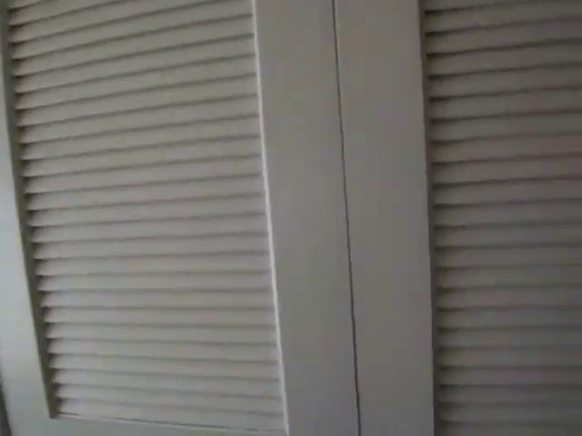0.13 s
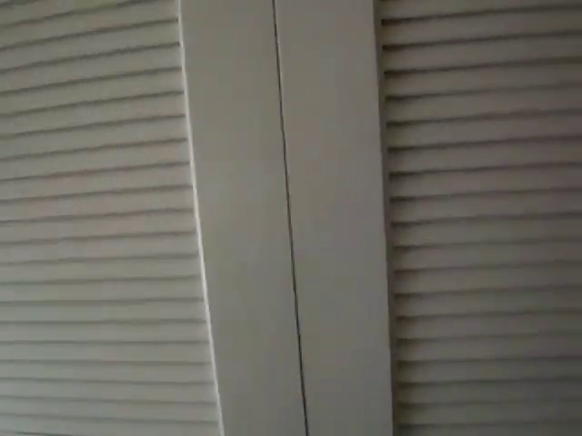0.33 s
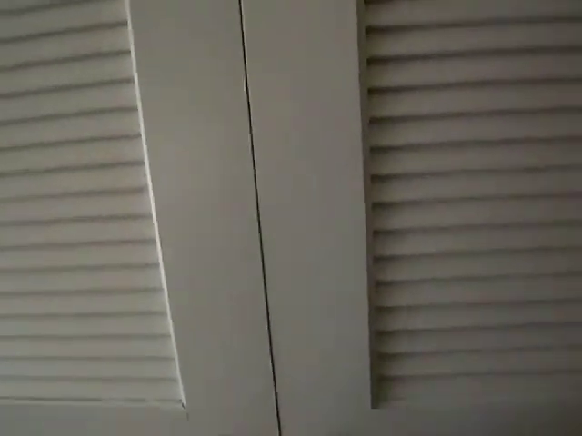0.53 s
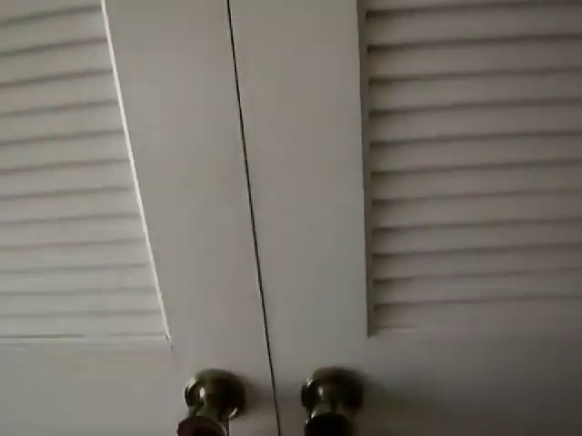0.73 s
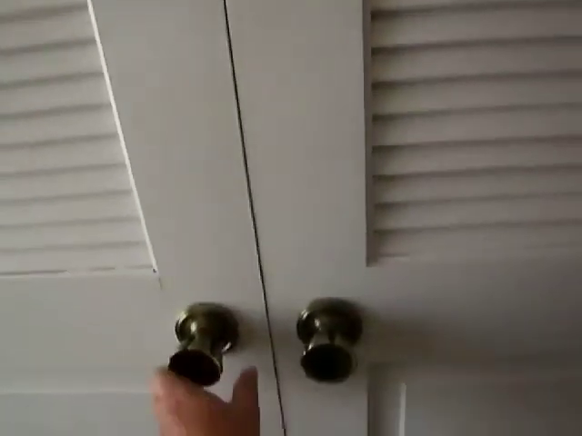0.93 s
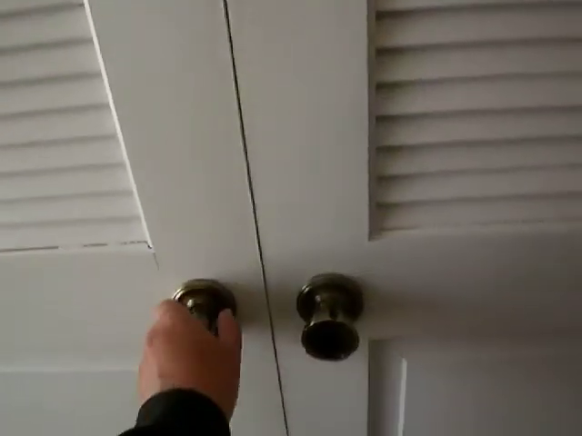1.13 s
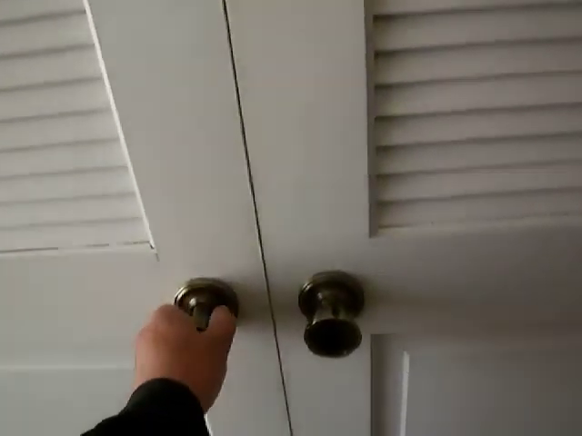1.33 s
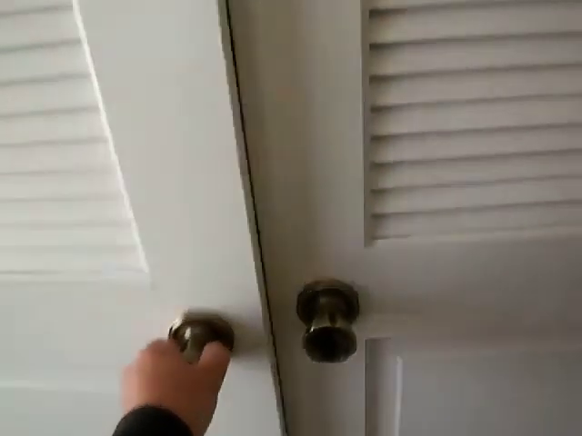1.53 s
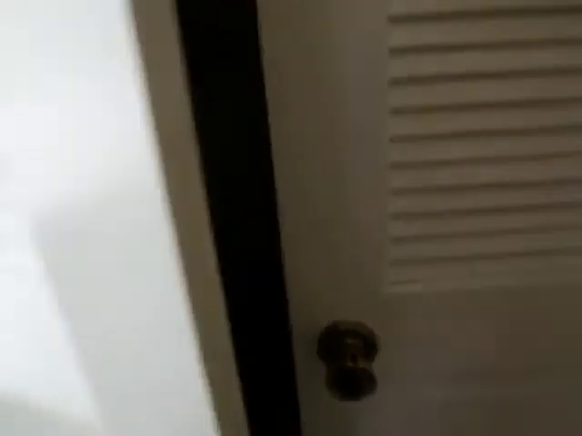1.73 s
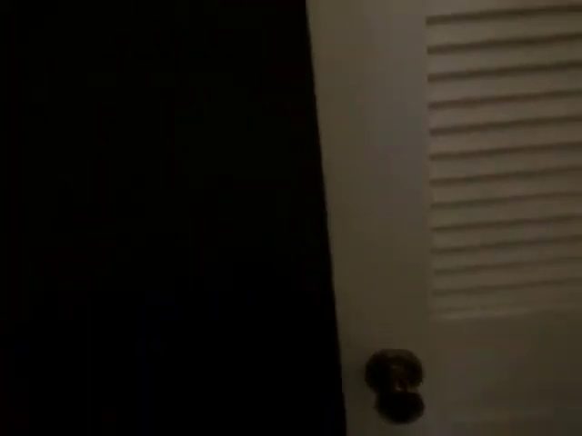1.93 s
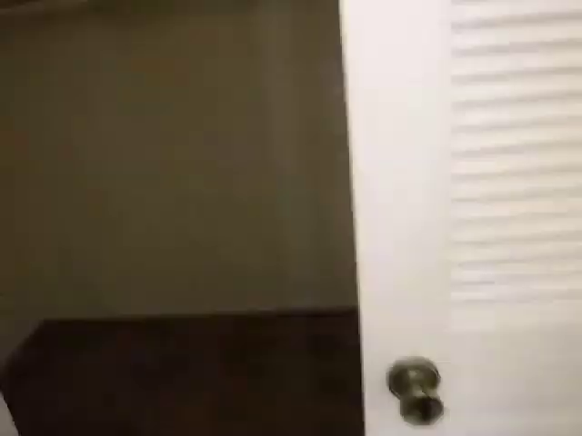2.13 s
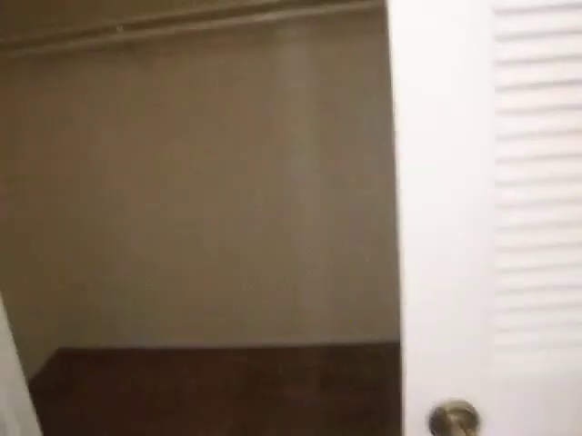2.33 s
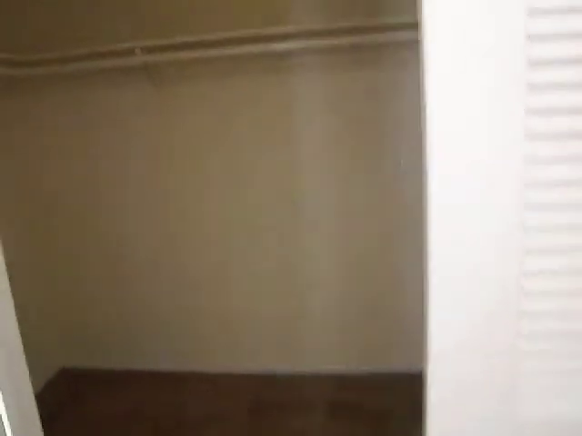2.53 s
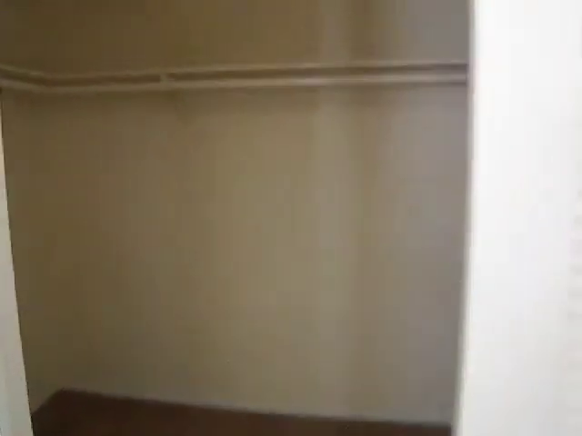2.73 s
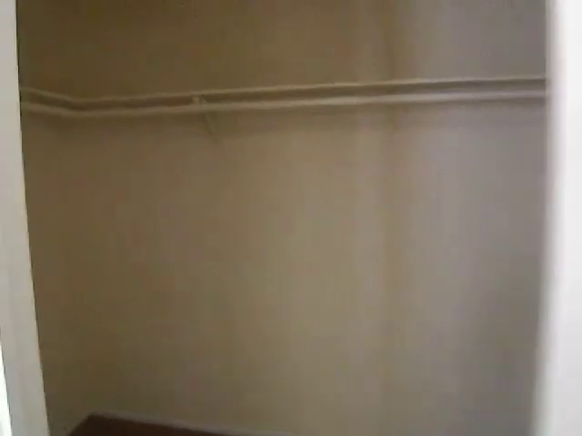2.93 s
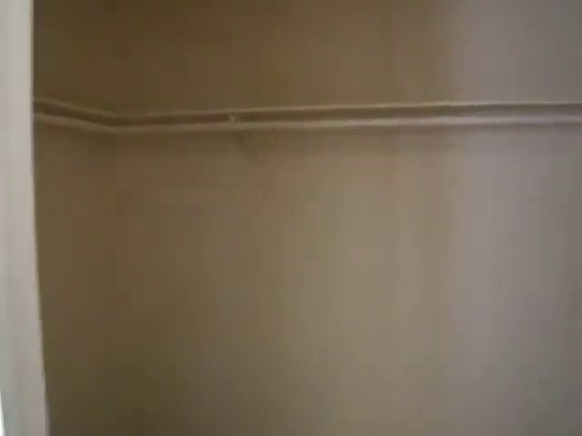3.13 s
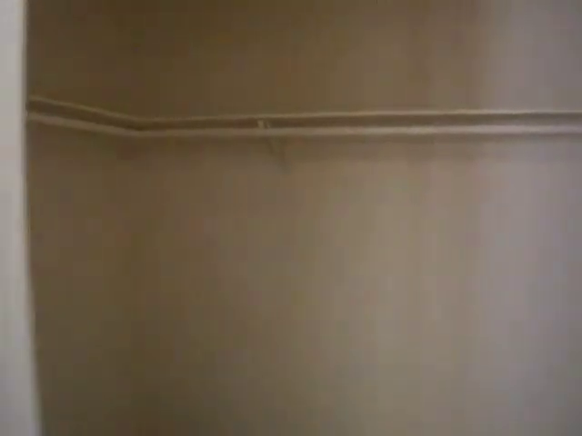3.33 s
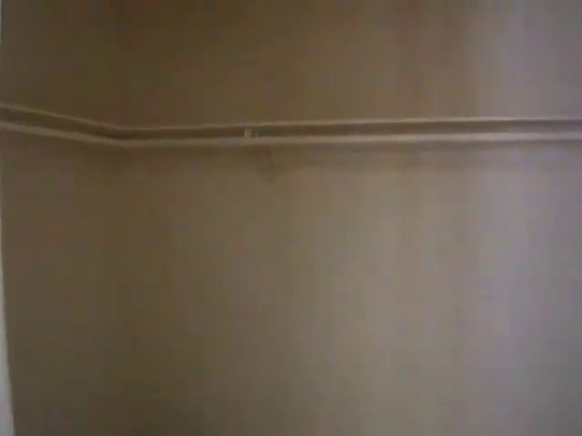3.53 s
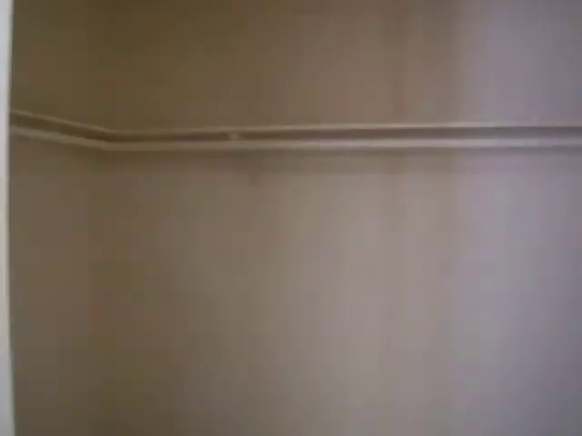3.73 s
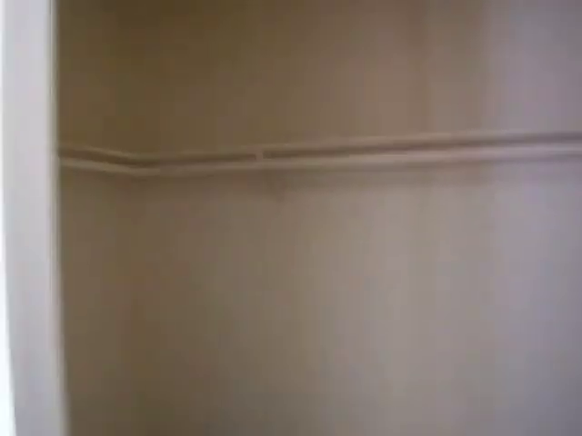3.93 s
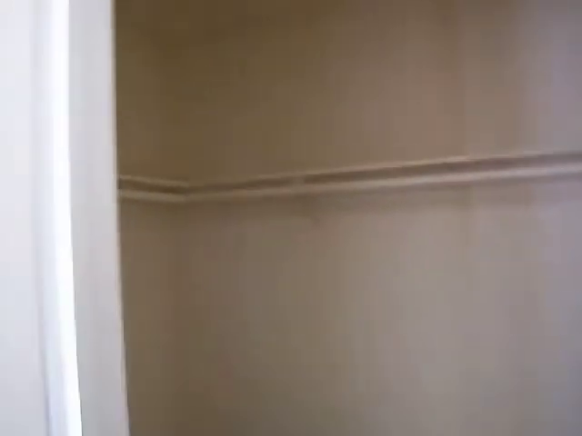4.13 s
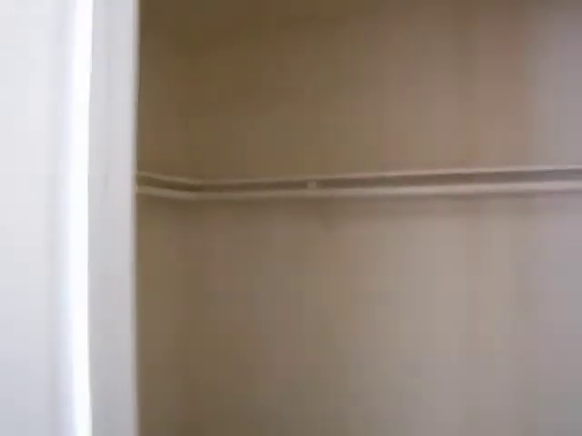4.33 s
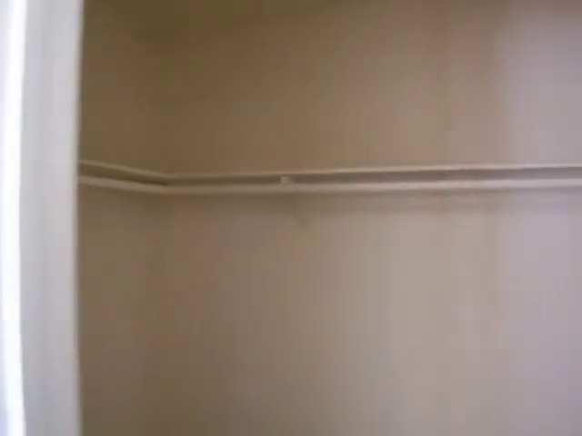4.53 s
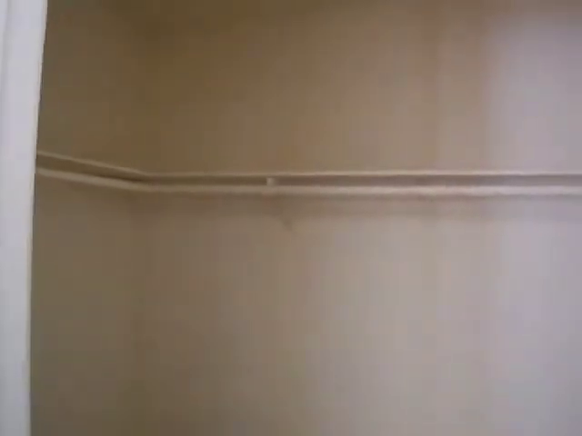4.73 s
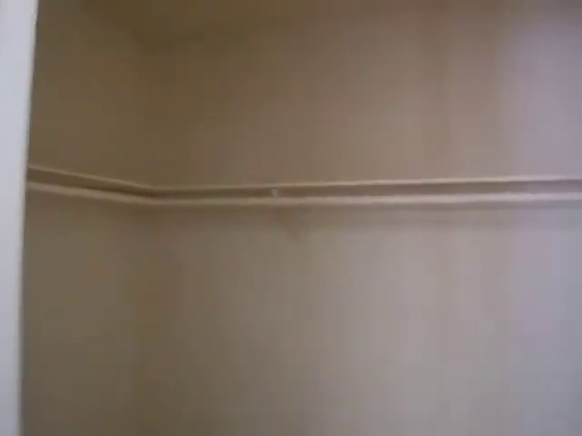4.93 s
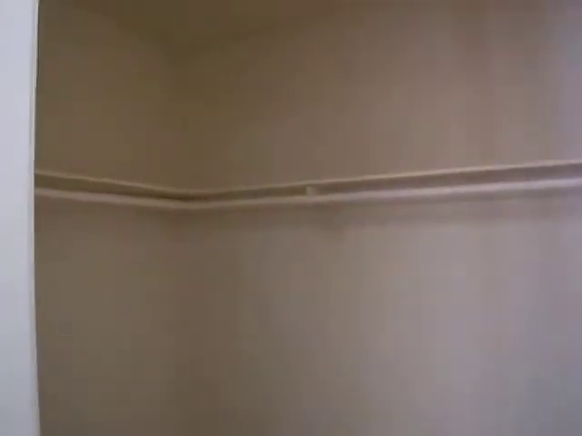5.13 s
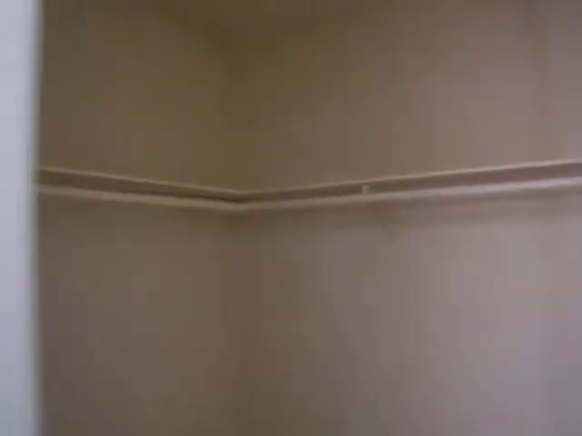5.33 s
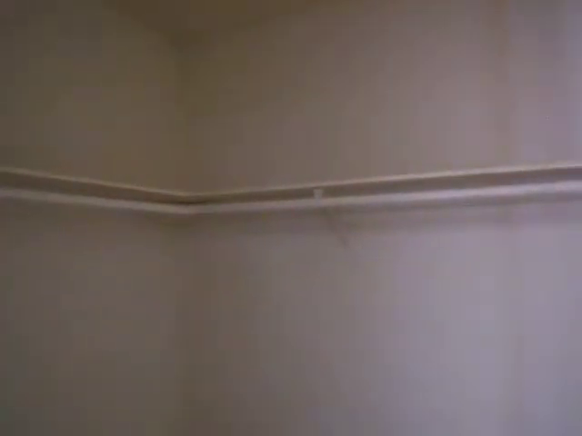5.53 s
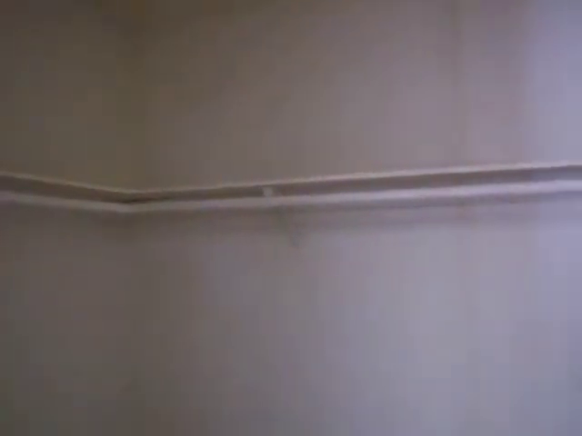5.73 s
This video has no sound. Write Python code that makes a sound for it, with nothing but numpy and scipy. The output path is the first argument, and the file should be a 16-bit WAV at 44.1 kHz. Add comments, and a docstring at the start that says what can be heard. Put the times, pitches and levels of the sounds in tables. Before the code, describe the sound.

Close to a hand-held microphone in an empty room, soft rubs and a knob touch lead to small wooden knocks, then a sharp crack as the first slatted closet door pops free and rattles faintly. After a lull with air puffs, the second door bangs loose and shudders more strongly, then settles into low hum and hiss.

```python
"""A low throbbing hum and hiss in an empty room, then two louvered wooden closet doors are pulled free in turn.
Close to a hand-held camera, each leaf strains as uneven slips ringing a resonance, and bangs as rough contacts
drive its wooden modes. It then shivers against its track about 13 times a second while friction noise slides.
Thin metal modes chink at knob and pivot; low noise and single puffs of pressure buffet the microphone."""
import sys
import numpy as np
from scipy import signal
from scipy.fft import rfft, irfft
from scipy.io import wavfile
from scipy.ndimage import uniform_filter1d

SR = 44100
rng = np.random.default_rng(int(sys.argv[2]) if len(sys.argv) > 2 else 0)


def inscribe(sig):
    """Save sig as 16-bit PCM at rate SR to the path in sys.argv[1].

    A 1-D sig is mono; a 2-D sig holds one channel per row.
    Samples are clipped to [-1, 1] before scaling.
    """
    pcm = np.round(np.clip(np.atleast_2d(sig).T, -1, 1) * 32767)
    wavfile.write(sys.argv[1], SR, pcm.astype(np.int16))


N = 259308

# air on the microphone and dull rumble: start_s, buffet_db, rumble_db
AIR_LEVELS = [(0.0, -48.5, -49), (0.77, -44.5, -52.5), (0.85, -50, -45.5), (1.15, -47, -54),
              (1.28, -37, -35.5), (1.42, -37.5, -46), (1.6, -28, -24.5), (1.64, -25, -44),
              (1.74, -31.5, -37.5), (2.03, -40.5, -67), (2.15, -29.5, -59), (2.23, -40, -72),
              (2.31, -44, -51), (2.59, -39, -57), (2.75, -31, -54), (2.96, -54.5, -64), (3.47, -48.5, -58),
              (3.85, -32, -39.5), (4.01, -39, -52), (4.31, -43.5, -48.5), (4.88, -51, -59),
              (5.88, -50, -61.5)]
# sliding in the track and rustle of the moving person: start_s, slide_db, rustle_db
MOTION_LEVELS = [(0.0, -56, -58), (.3, -55.5, -57.5), (.7, -62, -62), (1.21, -60, -59), (1.28, -65, -47),
                 (1.39, -44.5, -59), (1.49, -46, -47), (1.65, -40, -41.5), (1.96, -53.5, -63),
                 (2.29, -48.5, -63.5), (2.6, -52, -57.5), (3.06, -55, -64.5), (3.29, -64.5, -70),
                 (3.56, -72, -78.5), (3.68, -46.5, -41.5), (3.78, -55, -54), (3.83, -33, -37.5),
                 (4.16, -51, -53.5), (4.55, -52.5, -52), (4.9, -59, -66), (5.24, -61.5, -64.5),
                 (5.88, -69, -73)]
# each leaf tapping its track: beat_s, contact_length_s, ring_db,
# then mean colour: drum_db, boom_db, hollow_db, body_db, clack_db, tick_db
LEAF_SHIVERS = [(0.0771, 0.0088, -8.5, -18.5, -26, -17.5, -6.5, -16, -30.5),
                (.0784, 0.0076, -5, -24, -32.5, -25.5, -13, -13, -15.5)]
# strength of those taps, one list a leaf: start_s, level_db (before colour)
SHIVER_LEVELS = [
    [(1.731, -26), (1.88, -43), (1.96, -41), (2.037, -36.5), (2.12, -39), (2.2, -40)],
    [(3.8605, -18), (4.02, -26), (4.17, -19), (4.41, -19), (4.645, -21), (4.72, -37.5), (4.89, -44.5)],
]


def gain_of(db):
    """dB to gain."""
    return 10 ** (np.asarray(db) / 20)


def evened(x):
    """Scales to rms 1."""
    return x / np.sqrt(np.mean(x ** 2) + 1e-20)


def steadied(x, samples):
    """Evens out the swell of a narrow noise, keeping its wandering phase."""
    power = abs(uniform_filter1d(x ** 2, int(samples)))
    return evened(x / np.sqrt(power + 0.12 * np.mean(x ** 2)))


def read(points, hz):
    """Reads a spectrum on a log frequency axis."""
    f, value = np.transpose(points)
    return np.interp(np.log(hz + 1), np.log(f + 1), value)


def curves(rows):
    """Columns of a table at every sample."""
    s, *columns = np.transpose(rows)
    return [np.interp(np.arange(N) / SR, s, c) for c in columns]


def resonate(x, hz, width):
    """A resonance of gain 1: shifts the curve hz down to zero, smooths, and shifts back."""
    turn = np.exp(2j * np.pi * np.cumsum(hz * np.ones(len(x))) / SR)
    r = np.exp(-np.pi * width / SR)
    smooth = signal.lfilter([1 - r], [1, -r], x / turn + 1e-18)
    return 2 * (turn * smooth).real


def band(x, lo_hz, hi_hz):
    """Band-pass."""
    return signal.sosfilt(signal.butter(4, [lo_hz, hi_hz], "band", fs=SR, output="sos"), x)


def coloured(points):
    """Steady noise of a given spectrum, at rms 1."""
    z = rfft(rng.standard_normal(N))
    return evened(irfft(z * gain_of(read(points, np.fft.rfftfreq(N, 1 / SR))), N))


def lumps(per_s, depth_db):
    """Random unevenness of level."""
    return evened(gain_of(depth_db * evened(band(rng.standard_normal(N), per_s / 8, per_s))))


def floor():
    """Steady hiss, with a buzz of short even dips in the camera's electronics."""
    # spectrum of the hiss: frequency_hz, relative_db_per_hz
    hiss_spectrum = [(12, -27.5), (20, -1.5), (42, 4), (112, -3), (273, -21.5), (420, -14), (1780, -27),
                     (2030, -27.5), (7390, -28.5), (7970, -37.5), (8600, -72), (11200, -97), (18900, -120)]
    hiss_db = -56.5
    buzz_hz, first_dip_s, dip_db, dip_width_s = 30.02, .0303, -43, 0.0022
    cycle = ((np.arange(N) / SR - first_dip_s) * buzz_hz + .5) % 1 - .5
    dips = np.exp(-(cycle / buzz_hz / dip_width_s) ** 2 / 2)
    return gain_of(hiss_db) * coloured(hiss_spectrum) - gain_of(dip_db) * (dips - dips.mean())


def rumble():
    """Lumpy low noise, strongest per hertz near 150 Hz."""
    _, rumble_db = curves(AIR_LEVELS)
    dull = coloured([(110, -26), (150, -1), (300, -5.5), (500, -16.5), (700, -30.5)])
    return gain_of(rumble_db) * evened(dull * lumps(20, 2.2))


def drone():
    """The panels' drone: noise through two resonances near 100 Hz, swelling after the second leaf's taps."""
    # level before the swells: start_s, level_db
    drone_levels = [(0, -47.5), (1.08, -52), (1.36, -40), (1.47, -61), (1.57, -46), (1.93, -50),
                    (2.39, -42), (2.57, -53), (2.78, -37), (2.91, -63), (3.45, -62.5), (3.52, -47),
                    (4.0, -35.5), (4.06, -45.5), (4.33, -38), (4.7, -47.5), (5.05, -53.5), (5.1, -65),
                    (5.55, -64), (5.62, -55.5), (5.88, -58)]
    throb_db, beat_db, beat_lag_s = 0.9, 4.5, .018
    (level_db,) = curves(drone_levels)
    narrow = resonate(resonate(rng.standard_normal(N), 102.2, 16), 100, 31)
    hum = steadied(narrow, 900) * lumps(14.9, throb_db)
    since = np.arange(N) / SR - SHIVER_LEVELS[1][0][0] - beat_lag_s
    swell = np.cos(2 * np.pi * since / LEAF_SHIVERS[1][0])
    hum *= gain_of(beat_db * swell * (since > 0) * (since < 1.2))
    return gain_of(level_db) * hum


def panel_tone():
    """A higher panel resonance, growing during the second shiver."""
    on_s, off_s, start_db, rise_db = 4.02, 4.41, -52.5, 7.5
    grown = (np.arange(N) / SR - on_s) / (off_s - on_s)
    level = gain_of(start_db + rise_db * np.clip(grown, 0, 1)) * (grown > 0) * (grown < 1)
    tone = steadied(resonate(rng.standard_normal(N), 296, 5.9), 1500)
    return uniform_filter1d(level, 1800) * tone  # softened ends


def buffets():
    """Pushed air on the microphone: gusty noise between 16 and 62 Hz."""
    gust_db = 3
    air_db, _ = curves(AIR_LEVELS)
    air = steadied(band(rng.standard_normal(N), 16, 62), 1100) * lumps(15.5, gust_db)
    return gain_of(air_db) * air


def puffs():
    """Single puffs of air on the microphone: a push of pressure between two shallow dips."""
    # centre_s, peak_db, width_s
    puff_events = [(1.53, -19.5, 0.0027), (1.642, -18, 0.0043), (2.138, -22, 0.0018), (2.2, -24.5, 0.003),
                   (2.289, -22, 0.002), (2.326, -21.5, 0.0031), (2.372, -25.5, 0.0014),
                   (2.401, -20, 0.0016), (2.409, -26, 0.0027), (2.458, -25, 0.0034), (2.721, -34, 0.0025),
                   (2.744, -27, 0.0015), (2.779, -29, 0.0033), (3.742, -21.5, 0.012), (3.855, -23, 0.0065),
                   (3.897, -20.5, 0.0076)]
    t, out = np.arange(-3000, 3000) / SR, np.zeros(N)
    for s, db, width in puff_events:
        u = t / width
        push = 1.5 * np.exp(-u ** 2 / 2) - .5 * np.exp(-u ** 2 / 18)
        out[round(s * SR) - 3000:][:6000] += gain_of(db) * push
    return out


def room(x):
    """Room tail: sparse taps of random sign, each frequency band dying at its own speed."""
    # frequency_hz, t60_s
    decay = [(150, 1), (500, 0.28), (1500, 0.26), (4000, 0.24), (8000, 0.21)]
    taps = np.zeros(SR)
    at = np.arange(200, SR - 20, 20)
    taps[at + rng.integers(0, 20, len(at))] = rng.choice([-1., 1.], len(at))
    hz, t, z = signal.stft(taps, SR, nperseg=256)
    dying = z * gain_of(-60 * t / read(decay, hz)[:, None])
    tail = signal.istft(dying, SR, nperseg=256)[1]
    return signal.fftconvolve(x, tail / np.linalg.norm(tail))[:N]


def rustle():
    """Rustle of the moving person: bright lumpy noise, with duller scuffs following it."""
    # frequency_hz, relative_db_per_hz
    rustle_spectrum = [(1530, -27), (2600, -0.5), (7150, -7), (8020, -14.5), (8350, -24), (8600, -42.5),
                       (11200, -79), (18900, -120)]
    scuff_db = -4  # relative to the rustle
    _, rustle_db = curves(MOTION_LEVELS)
    scuff = evened(band(rng.standard_normal(N) * lumps(30, 0.6), 1600, 2420))
    bright = coloured(rustle_spectrum) * lumps(51, 1.3)
    return gain_of(rustle_db + scuff_db) * scuff + gain_of(rustle_db) * bright


def sliding():
    """Grainy friction through the track's resonances and two broader bands."""
    # resonance_hz, width_hz, relative_db
    track_modes = [(735, 180, 1), (960, 41, -3), (1197, 110, 7), (1372, 81, 14), (1500, 25, 1.5)]
    slide_db, _ = curves(MOTION_LEVELS)
    grain = rng.standard_normal(N) * lumps(18, 2.2)
    track = sum(gain_of(db) * evened(resonate(grain, hz, w)) for hz, w, db in track_modes)
    low, high = evened(band(grain, 620, 1610)), evened(band(grain, 1600, 3600))
    return gain_of(slide_db) * evened(evened(track) + 1.5 * low + .5 * high)


def rubs(events):
    """Soft rubs of hand, sleeve and wood: noise in one broad resonance swells and fades."""
    out, grit = np.zeros(N), rng.standard_normal((len(events), 8000))
    t = np.arange(-4000, 4000) / SR
    for (s, db, hz, length), g in zip(events, grit):
        pitched = evened(resonate(resonate(g, hz, 0.35 * hz), hz, 0.45 * hz))
        sound = gain_of(db) * np.exp(-(2 * t / length) ** 2) * pitched
        a = round(s * SR) - 4000
        out[max(a, 0):a + 8000] += sound[max(-a, 0):N - a]
    return out


def settling(count=21):
    """The leaf settling: faint rubs scattered at about even steps, each of three pitches in turn."""
    # pitch_hz
    settle_pitches = (683, 1490, 1960)
    from_s, to_s, mean_db, mean_length_s = 4.74, 5.36, -62.5, 0.061
    step, chance = (to_s - from_s) / count, rng.random((count, 3))
    return [(from_s + (k + a) * step, mean_db + 6 * (b - .5), settle_pitches[k % 3], mean_length_s * (.5 + c))
            for k, (a, b, c) in enumerate(chance)]


def chinks(events, modes):
    """Metal parts ring on a few thin modes, shared out anew at each touch."""
    t, out = np.arange(12000) / SR, np.zeros(N + 12000)
    spread = rng.standard_normal((len(events), len(modes)))
    for (s, db, tilt_db), row in zip(events, spread):
        for (hz, mode_db, t60), chance in zip(modes, row):
            tilt = np.clip(tilt_db, -4, 4) * np.log2(hz / 3000)
            level = gain_of(db + mode_db + 2.5 * chance + tilt - 60 * t / t60)
            out[round(s * SR):][:12000] += level * np.sin(2 * np.pi * hz * t)
    return out[:N]


def strain():
    """Uneven slips of the jammed edge ring a rising wooden resonance before the leaf lets go."""
    # one list a door: start_s, level_db, pitch_hz
    strain_curves = [
        [(1.57, -43, 550), (1.575, -19, 600), (1.59, -28.5, 905), (1.6, -17.5, 1141), (1.608, 0, 1250)],
        [(3.779, -41, 720), (3.783, -34.5, 726), (3.806, -27, 740), (3.811, -17.5, 793), (3.818, -24.5, 890)],
    ]
    # one a door, the second creaking on a clearer pitch: width_hz
    creak_widths = (540, 200)
    out = np.zeros(N)
    slips = rng.standard_normal(N) * (rng.random(N) < 2500 / SR)  # about 2500 a second
    for rows, width_hz in zip(strain_curves, creak_widths):
        a, b = round(rows[0][0] * SR), round(rows[-1][0] * SR)
        db, hz = (c[a:b] for c in curves(rows))
        creak = resonate(resonate(slips[a:b], hz, width_hz), hz, width_hz)
        out[a:b] = gain_of(db) * steadied(creak, 150) * signal.windows.tukey(b - a, .15)
    return out


def shivers():
    """Evenly spaced taps, each a little different in colour: one list of full blows per leaf."""
    tap_spread_db = 2
    leaves = []
    for (beat, length, ring_db, *colour), rows in zip(LEAF_SHIVERS, SHIVER_LEVELS):
        s, db = np.transpose(rows)
        times = np.arange(s[0], s[-1], beat)
        spread = tap_spread_db * rng.standard_normal((20, 6))
        leaves.append([(a, np.interp(a, s, db), *(colour + c), length, ring_db)
                       for a, c in zip(times, spread)])
    return leaves


def blows():
    """Spreads each knock over the bands: the plain colour, tilted, with its own body and lows."""
    # start_s, level_db (before colour), tilt_db_per_octave, extra_body_db, extra_lows_db, contact_length_s
    knock_events = [(.86, -43, -2, 9, 1.5, 0.011), (0.894, -30, -0.6, -1.5, 0.5, 0.022),
                    (1.216, -23, -2, 3.5, 0, 0.0022), (1.225, -20.5, 0.4, 6, 9.5, 0.0068),
                    (1.276, -9, -2, 4, 4, 0.0045), (1.296, -26, -13, -1, 8, 0.0033),
                    (1.453, -26.5, -1, -6, 11.5, 0.0022), (1.472, -27, 3, 5.5, -2.5, 0.0029),
                    (1.485, -17.5, 1, -5, 9, 0.0041), (1.496, -25.5, -4, 8.5, 12.5, 0.0067),
                    (1.533, -23, 9, 12, -7, 0.004), (1.57, -13.5, -8.5, -4, 16.5, 0.0015),
                    (1.605, 3.5, 3.5, -7, -0.5, 0.002), (1.61, -9.5, -6, 17, 3, 0.0019),
                    (2.217, -50, -1, 7, -7, .004), (2.337, -40, -6, 14, -10, 0.0044),
                    (3.606, -42, -12.5, 10, -4, 0.013), (3.621, -4, -1, -3, -22.5, 0.005),
                    (3.656, -19, 0.5, -2, -2, 0.0052), (3.695, -23, 1.5, 4, -14, 0.0055),
                    (3.73, -15, 2, -12, -12.5, 0.0022), (3.813, -4.5, .3, 7.5, 5, 0.0058),
                    (3.827, 1.5, -2, -0.5, -12, 0.0049), (5.09, -46, -0.5, 4, 8, 0.0064),
                    (5.153, -47, 3.5, -3.5, -10, 0.0044), (5.292, -36.5, 5, -4, 0.5, 0.0022),
                    (5.374, -36, -3, 5, -8, 0.0065)]
    # a plain knock: drum_db, boom_db, hollow_db, body_db, clack_db, tick_db
    plain_colour = (-22, -20, -17, -13.5, -12.5, -13)
    ring_db = -6
    octaves = np.array([0, 0, -1.2, 0, 1, 2])
    low_share = np.array([1, 1, 0.44, 0, 0, 0])  # the hollow band takes only part of the extra lows
    body_share = np.array([0, 0, 0, 1, 0, 0])
    return [(s, db, *(plain_colour + tilt_db * octaves + body_db * body_share + low_db * low_share),
             length, ring_db)
            for s, db, tilt_db, body_db, low_db, length in knock_events]


def knocks(events):
    """A short rough contact and the chatter of loose slats sound directly and drive the door's modes."""
    # mode_hz, level_db, t60_s (at most 40 cycles are allowed below)
    door_modes = [(226, 1.5, 0.13), (291, -4, 0.17), (464, -10, 0.12), (502, -10.5, 0.17),
                  (596, -14.5, 0.024), (674, 17.5, 0.19), (792, 15.5, .06), (880, -4.5, 0.051),
                  (1135, 5.5, 0.18), (1120, -17, .06), (1350, 0.5, 0.077), (1372, 6.5, 0.075),
                  (1570, 2.5, 0.0404), (1820, -5, .04), (1894, 6, .04), (2110, -3.5, .03),
                  (2340, -0.5, 0.039), (3360, -14.5, .02), (3300, -14, 0.022), (4070, 5.5, 0.015),
                  (4307, 2.5, .01), (4670, -4, .01), (6985, 1.5, 0.013), (7590, 3.5, .01)]
    # edges of the boom, hollow, body, clack and tick bands: edge_hz
    band_edges = [170, 500, 1100, 2500, 5000, 8600]
    drum_hz, drum_t60_s, drum_rise_s = 103.4, .16, .015  # the whole leaf as a drum
    t = np.arange(8192) / SR
    loss = 40  # t60 limit in cycles: wood keeps no mode longer
    ring = sum(gain_of(db - 60 * t / min(t60, loss / hz)) * np.sin(2 * np.pi * hz * t)
               for hz, db, t60 in door_modes)
    grit = rng.standard_normal((len(events), 4096))
    force, push = np.zeros((2, 5, N + 4096)), np.zeros(N)  # force: direct and ringing, by band
    u = t[:4096]
    for (s, db, drum_db, *share_db, length, ring_db), g in zip(events, grit):
        at = round(s * SR)
        chatter = 0.038 * np.exp(-u / 0.011)
        fade = np.exp(-u / np.clip(length, .0007, .03)) + chatter
        rough = g * np.minimum(u / 0.0012, 1) ** 2 * fade
        contact = rough * gain_of(db + np.array(share_db))[:, None]
        force[:, :, at:at + 4096] += [contact, gain_of(ring_db) * contact]
        push[at] = gain_of(db + drum_db)
    drum = (1 - np.exp(-t / drum_rise_s)) * gain_of(-60 * t / drum_t60_s) * np.sin(2 * np.pi * drum_hz * t)
    out = signal.oaconvolve(push, drum)[:N]
    for k in range(5):
        edges = band_edges[k], band_edges[k + 1]
        click, part = band(t == 0, *edges), band(ring, *edges)
        out += signal.oaconvolve(force[0, k], click / np.linalg.norm(click))[:N]
        out += signal.oaconvolve(force[1, k], part / np.linalg.norm(part))[:N]
    return out


def scene():
    """Door sounds, their room tail, and the layers heard around them."""
    # pivot hardware chinking: start_s, level_db, tilt_db_per_octave (limited to 4 either way)
    pivot_events = [(2.2273, -54, -9), (2.3494, -58, -4.5), (3.697, -42, 1)]
    # pivot: mode_hz, level_db, t60_s
    pivot_modes = [(1850, -6, .05), (2280, -12, .3), (2720, -5, .08), (2880, -6, .06), (3300, 1, .07),
                   (3400, 3, .08), (3520, -3, .06), (4620, -12, .1), (5050, -3, .1)]
    # touch on the knob: start_s, level_db, tilt_db_per_octave
    knob_touches = [(1.165, -41.5, 0.0048)]
    # knob: mode_hz, level_db, t60_s
    knob_modes = [(1800, -7.5, .03), (1855, -2, 0.037), (4830, -15.5, 0.12)]
    # soft short rubs: centre_s, level_db, pitch_hz, length_s
    rub_events = [(.057, -48.5, 630, 0.069), (.098, -51.5, 1050, 0.076), (.3, -63, 2080, 0.31),
                  (.831, -45, 399, 0.034), (.94, -46, 229, .03), (1.03, -45.5, 330, 0.0291),
                  (1.246, -37, 890, 0.031), (1.283, -36, 1500, 0.03), (1.32, -46.5, 520, 0.12),
                  (1.598, -28, 3700, 0.0038), (1.672, -48, 1350, .02), (1.758, -42, 1330, 0.086),
                  (4.296, -45, 1500, 0.027), (4.958, -56.5, 646, 0.031), (5.4, -51, 1300, 0.035),
                  (5.578, -67, 1440, .034), (5.723, -62.5, 1480, .023)]
    pivot_db = -12.5  # the first leaf's taps also chink the pivot, this much lower
    first, second = shivers()
    tapped = [(s, db + pivot_db, -2.5) for s, db, *_ in first]
    metal = chinks(pivot_events + tapped, pivot_modes) + chinks(knob_touches, knob_modes)
    door = knocks(blows() + first + second) + strain() + metal + rubs(rub_events + settling())
    air = buffets() + puffs()
    around = floor() + rumble() + drone() + panel_tone() + air + rustle() + sliding()
    return (door + gain_of(-7.5) * room(door) + around)[None]


def record(dry):
    """A narrow sensor band, then a soft overload on the loudest bangs, then the band limit."""
    sensor_hz, edge_hz = 8050, 16300
    knee, room_left = .76, .12  # full scale is 1
    sensed = signal.oaconvolve(dry, signal.firwin(301, sensor_hz, window=("kaiser", 9), fs=SR)[None], "same")
    over = np.maximum(abs(sensed) - knee, 0)
    clipped = sensed - np.sign(sensed) * (over - room_left * np.tanh(over / room_left))
    return signal.oaconvolve(clipped, signal.firwin(511, edge_hz, window=("kaiser", 9), fs=SR)[None], "same")


dry = scene()
out = record(dry)
inscribe(out)
```